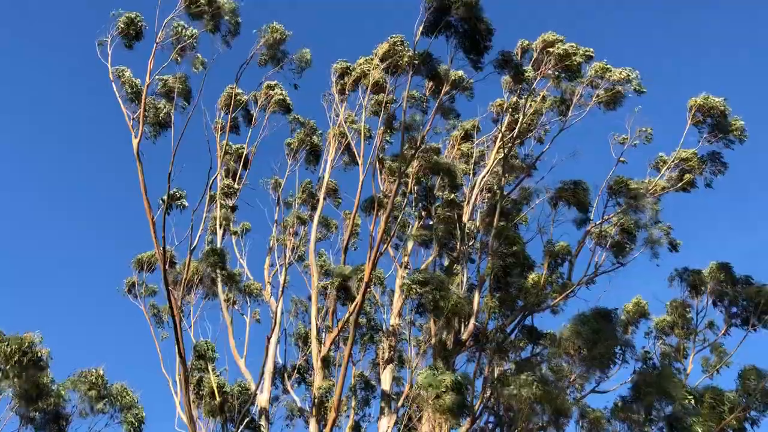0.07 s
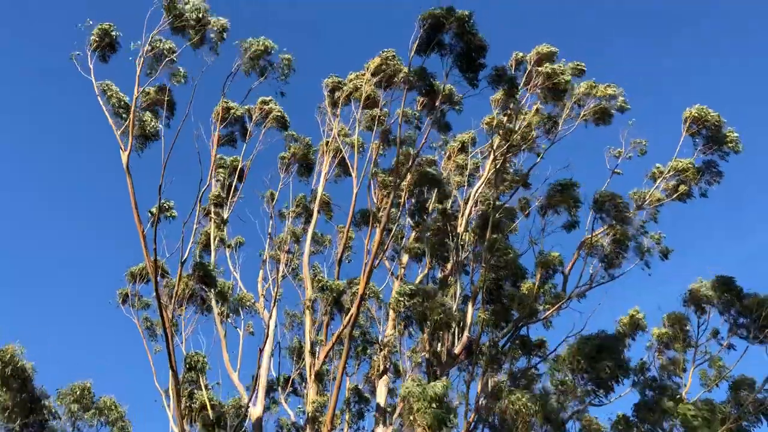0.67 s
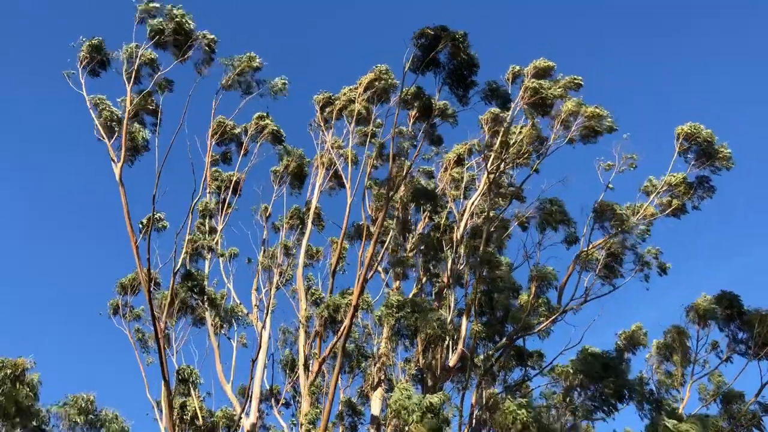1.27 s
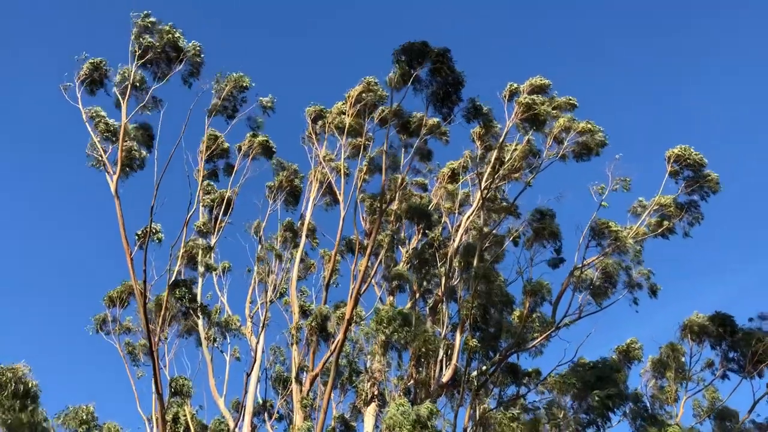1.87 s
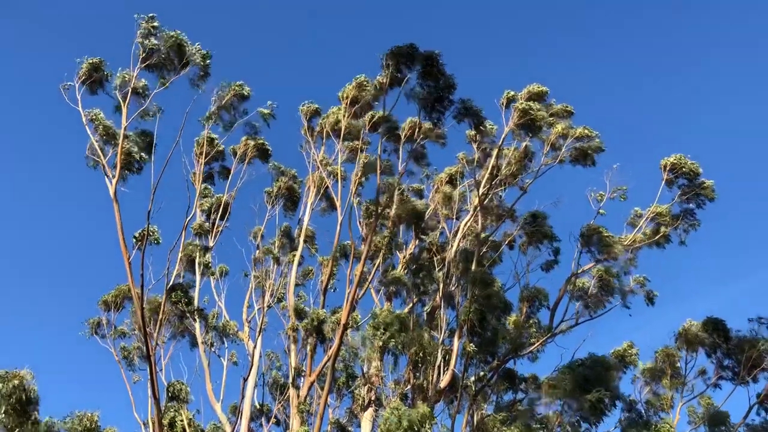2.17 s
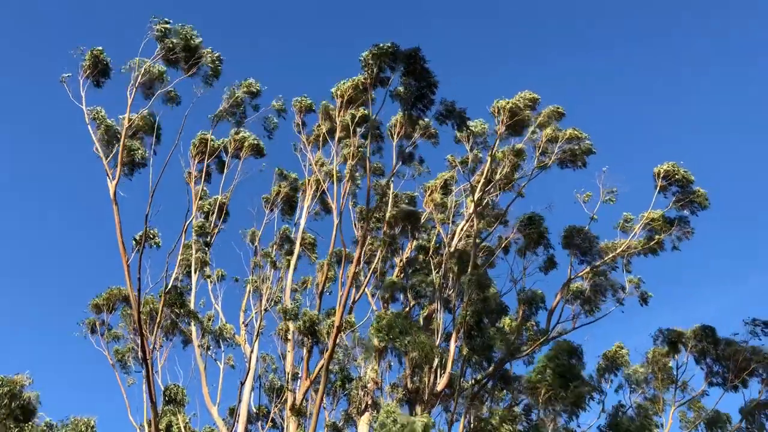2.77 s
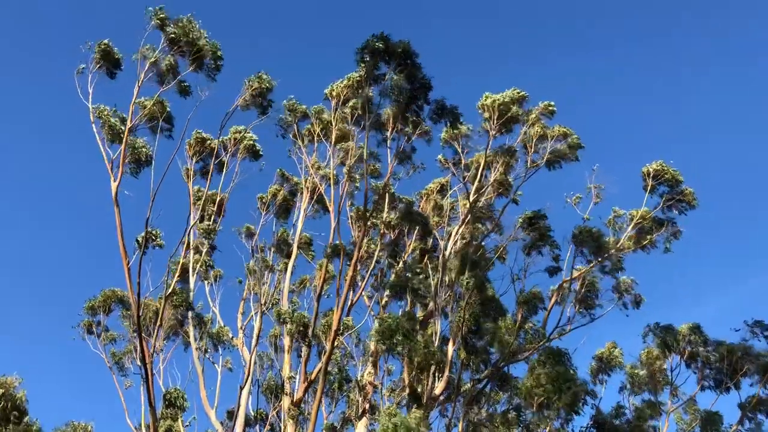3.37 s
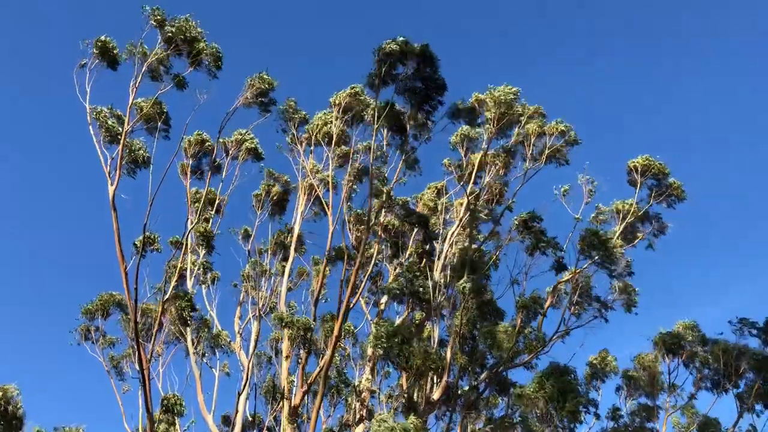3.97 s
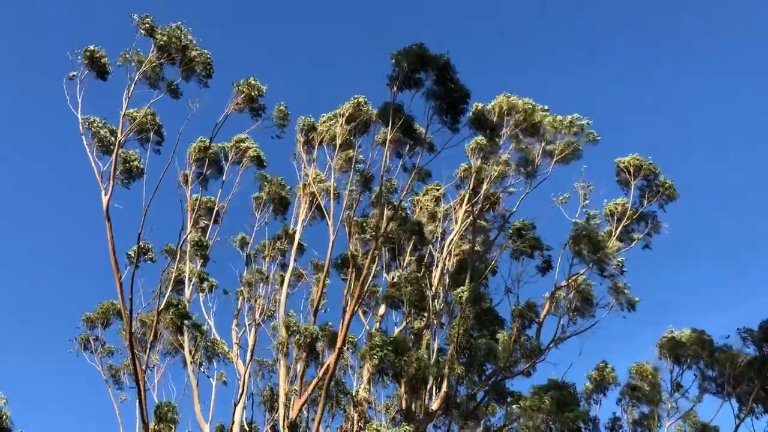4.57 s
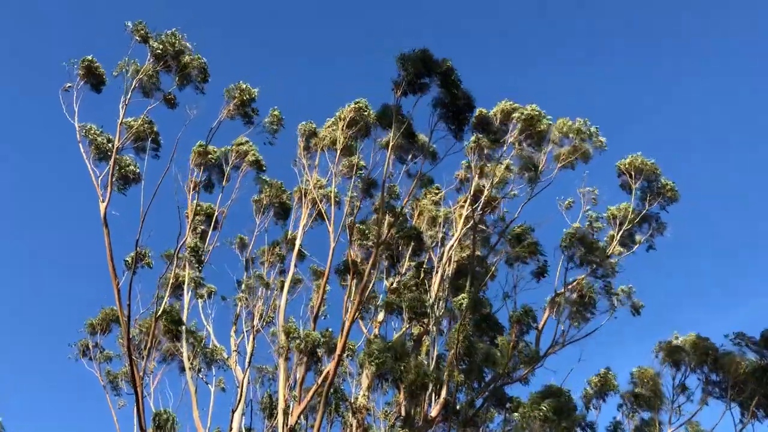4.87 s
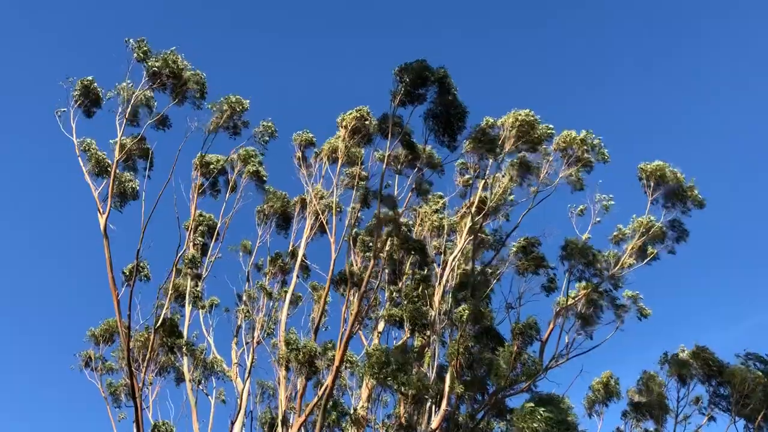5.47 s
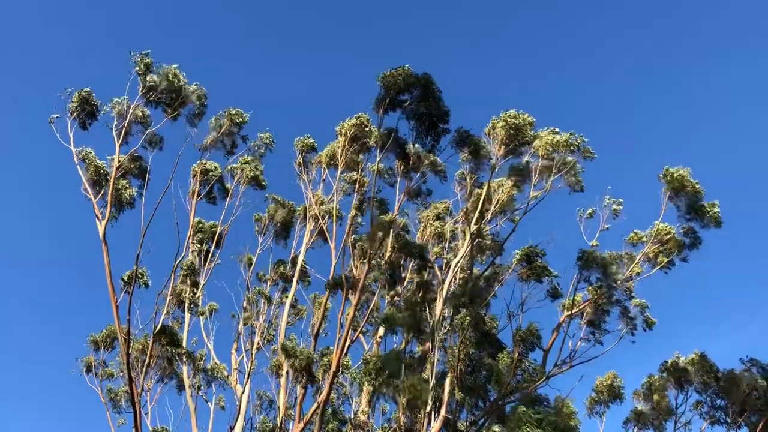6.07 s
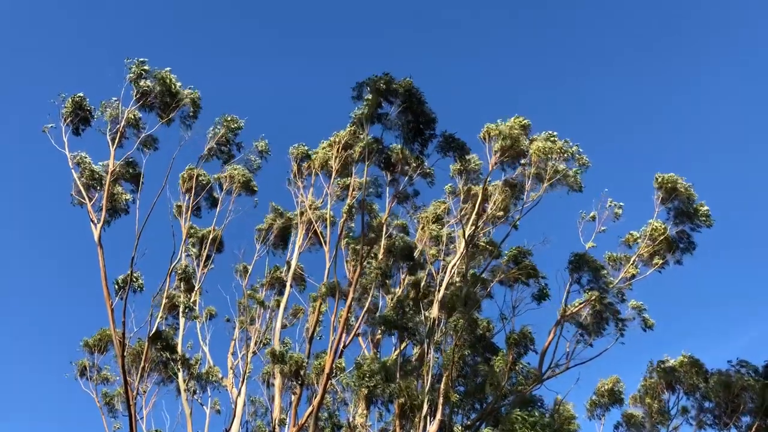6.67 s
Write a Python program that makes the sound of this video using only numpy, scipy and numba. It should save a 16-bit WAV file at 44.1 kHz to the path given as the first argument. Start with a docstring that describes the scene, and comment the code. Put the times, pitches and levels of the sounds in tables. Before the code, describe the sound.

Wind buffets the microphone in hard blasts, then eases, leaving treetops rustling steadily and a small bird chipping faintly.

```python
"""Wind buffeting a phone's microphone port, on the ground under tall trees. The buffets last three seconds:
the faster the eddies, the louder and brighter they blast, and a limiter holds the peaks.
A light breeze follows a lull. Behind it all the treetops roar and rustle steadily,
a few dry ticks sound, and a small bird gives short runs of tiny chips."""
import sys
import numpy as np
from scipy import signal
from scipy.fft import rfft, irfft
from scipy.io import wavfile
from scipy.ndimage import uniform_filter1d, minimum_filter1d
from numba import njit

SR = 44100
rng = np.random.default_rng(int(sys.argv[2]) if len(sys.argv) > 2 else 0)


def output_pcm(signal):
    """Save a mono or channel-first signal as 16-bit PCM at the path in sys.argv[1].

    Samples are clipped to [-1, 1] before scaling.
    """
    pcm = np.clip(np.atleast_2d(signal).T, -1, 1) * 32767
    wavfile.write(sys.argv[1], SR, np.round(pcm).astype(np.int16))


N = 295911
TIME_S = np.arange(N) / SR

# Wind round the phone, dying into a lull. Each row: time in seconds, strength in dB.
WIND = [(0.03, -26.5), (0.61, -22.5), (0.92, -24), (0.96, -22.5), (1.5, -24.5), (1.52, -26.5), (1.83, -28),
        (1.87, -28.5), (2.01, -28), (2.24, -36.5), (2.33, -30), (2.88, -34.5), (2.9, -32), (3.14, -36),
        (3.71, -44.5), (3.95, -57.5)]
# Buffets on the port. Each row: start in seconds, hold in seconds, level in dB,
# corner of the eddy spectrum in Hz, deep thump in dB.
BUFFETS = [(0.195, 0.15, -19.5, 716, -44), (0.217, .003, -7, 1110, -37), (0.238, 0.059, -7, 1134, -40),
           (0.311, 0.019, -10, 900, -35), (0.525, 0.11, -21, 352, -20), (0.561, 0.049, -5.5, 1450, -28),
           (0.615, 0.049, -11.5, 1290, -24), (0.638, 0.015, -6, 2200, -26), (0.674, .01, -15.5, 326, -13),
           (0.731, 0.017, -9.5, 1180, -31), (0.75, .004, -11.5, 563, -28), (1.0, .003, -25, 845, -28),
           (1.058, 0.032, -22, 620, -22), (1.117, 0.061, -9.5, 1250, -36), (1.197, 0.031, -13, 950, -26),
           (1.25, 0.0058, -15, 693, -26), (1.311, 0.0052, -22, 770, -28), (1.376, 0.021, -21, 725, -25),
           (1.409, 0.012, -23, 830, -38), (1.433, .025, -28, 500, -33), (1.47, 0.0055, -24, 710, -30),
           (1.704, 0.035, -24.5, 337, -23), (1.78, 0.039, -31, 230, -26.5), (1.968, 0.097, -31, 356, -27),
           (2.442, .04, -28, 375, -27), (3.007, 0.081, -29.5, 384, -25.5), (3.051, 0.0088, -17, 534, -32)]


def undb(db):
    """Decibels to gain."""
    return 10 ** (np.asarray(db) / 20)


def unit(x):
    """Scale to rms 1."""
    return x / np.sqrt(np.mean(x ** 2))


def curves(table):
    """Interpolate each column over the times in the first."""
    times_s, *columns = np.transpose(table)
    return [np.interp(TIME_S, times_s, column) for column in columns]


def colour(x, points):
    """Filter by (Hz, dB) points; nothing passes above the last."""
    hz, db = np.transpose(points)
    bins_hz = np.maximum(np.fft.rfftfreq(2 * N, 1 / SR), 1)
    gain = undb(np.interp(np.log(bins_hz), np.log(hz), db, right=-np.inf))
    return irfft(rfft(x, 2 * N) * gain)[:N]


def smooth(x, samples):
    """Moving average, applied twice."""
    return uniform_filter1d(uniform_filter1d(x, samples), samples)


def wander(rate_hz):
    """Smoothed random steps, rms 1."""
    step = max(int(SR / rate_hz), 2)
    held = np.repeat(rng.standard_normal(N // step + 1), step)
    return unit(smooth(held, step)[:N])


def steady(x, span_s):
    """Hold rms at 1 over span_s, keeping faster flutter."""
    span = max(int(span_s * SR), 2)
    return x / np.sqrt(smooth(x ** 2, span) + 1e-18)


def add(out, centre_s, sound):
    """Mix in a short sound, centred on centre_s."""
    start = max(int(centre_s * SR) - len(sound) // 2, 0)
    out[start:start + len(sound)] += sound[:N - start]


@njit
def lowpass(x, corner_hz, damping):
    """State-variable low-pass with a moving corner."""
    y = np.empty(len(x))
    band_state, low_state = 0., 0.
    for i in range(len(x)):
        g = np.tan(np.pi * corner_hz[i] / SR)
        band = (band_state + g * (x[i] - low_state)) / (1 + g * (g + damping))
        y[i] = low_state + g * band
        band_state, low_state = 2 * band - band_state, 2 * y[i] - low_state
    return y


@njit
def peak_hold(x, decay):
    """Peak follower: instant attack, exponential release."""
    y, peak = np.empty(len(x)), 0.
    for i in range(len(x)):
        peak = max(abs(x[i]), peak * decay)
        y[i] = peak
    return y


def treetops(sway_db=0.97, flicker_db=.5, grain_db=4.0, touches_per_s=9000, sizzle_db=-18.0):
    """Branches roar smoothly; thousands of uneven leaf touches merge into a hiss."""
    # Each row: time in seconds, branch roar in dB, leaf hiss in dB.
    crown_levels = [(0, -43.5, -51.5), (.55, -48, -51), (.59, -49.5, -53.5), (1.5, -48, -55),
                    (2, -45.5, -51.5), (2.6, -46, -52.5), (3.4, -46, -52), (4.2, -46.5, -52),
                    (5, -46.5, -53.5), (5.8, -47, -53.5), (6.7, -45.5, -54)]
    # Spectra. Each row: frequency in Hz, gain in dB.
    roar_spectrum = [(100, -11.5), (240, 1.5), (340, -1.5), (430, 0), (560, -2.5), (800, -4.5), (1200, -8),
                     (2000, -15), (3000, -21), (6000, -59.5)]
    leaf_spectrum = [(800, 0.5), (1600, 3.5), (2400, 1), (3500, -0.5), (5000, -4), (7000, -8.5),
                     (9000, -12), (11000, -18), (13000, -24), (16500, -29.5)]
    sizzle_spectrum = [(3000, -25.5), (6000, 3.5), (9000, 0), (12000, -7), (16500, -17)]
    roar_db, leaf_db = curves(crown_levels)
    roar = unit(colour(rng.standard_normal(N), roar_spectrum))
    touches = (rng.random(N) < touches_per_s / SR) * rng.standard_normal(N)
    touches *= undb(grain_db * np.minimum(rng.exponential(size=N), 4))
    leaves = unit(colour(unit(touches) + 1.47 * rng.standard_normal(N), leaf_spectrum))
    # the finest sizzle swings further than the rest of the hiss
    sizzle = unit(colour(rng.standard_normal(N), sizzle_spectrum))
    leaves += sizzle * undb(sizzle_db + 1.8 * (leaf_db - leaf_db.mean()))
    roar *= undb(roar_db + sway_db * wander(5.8))
    leaves *= undb(leaf_db + flicker_db * wander(21.82))
    return roar + leaves


def ticks(sigma_s=0.0015):
    """Thin, dry ticks: noise bursts high in the treble."""
    # Each row: time in seconds, level before filtering in dB.
    bursts = [(.63, -57), (.647, -59), (1.243, -54), (2.42, -55), (5.77, -60), (5.905, -58)]
    out, t = np.zeros(N), np.arange(-512, 512) / SR
    envelope = np.exp(-.5 * (t / sigma_s) ** 2)
    for time_s, db in bursts:
        add(out, time_s, undb(db) * envelope * rng.standard_normal(len(t)))
    return colour(out, [(3000, -26), (7000, -4), (10000, -1), (15000, 1)])


def chips(gap_s=.098, fade_db_per_chip=0.4, scatter_octaves=0.059, scatter_db=1.7):
    """The bird's runs as single chips: evenly spaced, fading, no two quite alike."""
    # Each row: first and last chip in seconds, pitch in Hz, base level in dB, relative overtones in dB.
    runs = [(0.151, 0.151, 2360, -41.5, -12), (0.373, 0.474, 2200, -39, -12),
            (0.434, 0.434, 2200, -41, -13), (0.865, 1.063, 2380, -46.5, -11), (1.366, 1.74, 2380, -46, -9),
            (1.945, 2.133, 2220, -43, -7), (2.957, 2.957, 2400, -45, -13), (3.143, 3.437, 2380, -40.5, -12),
            (3.505, 3.619, 2180, -43, -14), (3.554, 3.554, 2350, -43, -19), (3.833, 3.94, 2130, -44, -13),
            (3.883, 3.992, 2350, -45, -7), (4.087, 4.377, 2180, -41.5, -9),
            (4.471, 4.471, 2490, -47.5, -12)]
    for first_s, last_s, pitch_hz, run_db, bright_db in runs:
        count = 1 + round((last_s - first_s) / gap_s)
        for k, time_s in enumerate(np.linspace(first_s, last_s, count)):
            higher, louder = rng.standard_normal(2)
            db = run_db - fade_db_per_chip * k + scatter_db * louder
            yield time_s, pitch_hz * 2 ** (scatter_octaves * higher), db, db + bright_db


def bird(fall_octaves_per_s=55, sigma_s=0.0017, lead_s=0.00042, body_gain_db=3.0, edge_gain_db=2.0):
    """Each chip is a rough, falling squeak of a few ms; its overtones lead the fundamental."""
    out, t = np.zeros(N), np.arange(-256, 256) / SR
    roughness_rad = .7 * wander(2000)
    for time_s, pitch_hz, body_db, edge_db in chips():
        hz = pitch_hz * 2 ** (-fall_octaves_per_s * t)
        phase = 2 * np.pi * np.cumsum(hz) / SR
        jitter = roughness_rad[int(time_s * SR):][:len(t)]
        body = np.exp(-.5 * (t / sigma_s) ** 2) * np.sin(phase + jitter)
        overtones = np.sin(2 * phase + jitter) + 0.71 * np.sin(3 * phase + jitter)
        edge = np.exp(-.5 * ((t + lead_s) / sigma_s) ** 2) * overtones
        add(out, time_s, undb(body_db + body_gain_db) * body + undb(edge_db + edge_gain_db) * edge)
    return out


def slow_eddies(spectrum, span_s):
    """Large, slow eddies: a deep flutter, rms 1."""
    return steady(colour(rng.standard_normal(N), spectrum), span_s)


def breeze(start_s=3.68, rise_s=1.0, level_db=-46, wander_db=2):
    """A light breeze rises out of the lull as a low drone with soft puffs."""
    # Each row: centre in seconds, half length in seconds, level in dB.
    puffs = [(4.252, 0.013, -41), (4.36, 0.036, -40), (5.2, 0.32, -45.5), (5.798, .03, -38),
             (6.629, 0.01, -35.5)]
    # Each row: frequency in Hz, gain in dB.
    drone_spectrum = [(20, -30.5), (32, -26), (48, -6), (90, -2), (135, -1.5), (200, -6.5), (280, -21),
                      (600, -58), (1500, -64.5)]
    rise = np.clip((TIME_S - start_s) / rise_s, 0, 1)
    power = rise * undb(level_db + wander_db * wander(11)) ** 2
    for centre_s, half_s, db in puffs:
        power += undb(db) ** 2 * np.exp(-((TIME_S - centre_s) / half_s) ** 2)
    return np.sqrt(power) * slow_eddies(drone_spectrum, span_s=0.13)


def buffet_envelope(start_s, hold_s, attack_tau_s=0.0051, release_tau_s=0.008):
    """Quick rise, hold, slightly slower fall."""
    early_s = np.maximum(start_s - TIME_S, 0)
    late_s = np.maximum(TIME_S - start_s - hold_s, 0)
    return np.exp(-np.minimum(early_s / attack_tau_s + late_s / release_tau_s, 20))


def rumble(offset_db=-0.5, wander_db=2.5):
    """Slow eddies follow the wind's strength and thump with each buffet."""
    # Each row: frequency in Hz, gain in dB.
    rumble_spectrum = [(20, -54), (30, -28), (42, -9), (70, -1.5), (110, -5.5), (160, -7.5), (300, -21),
                       (600, -80), (1500, -82)]
    power = undb(curves(WIND)[0] + offset_db + wander_db * wander(14)) ** 2
    for start_s, hold_s, _, _, thump_db in BUFFETS:
        power += (undb(thump_db) * buffet_envelope(start_s, hold_s)) ** 2
    return np.sqrt(power) * slow_eddies(rumble_spectrum, span_s=0.061)


def airflow(brisk_db=-26, stir_db=-30, stir_hz=252, db_per_db=0.89, octaves_per_db=0.2064):
    """Eddy level in dB and corner in Hz: buffets ride on the wind; the strongest sets the brightness."""
    # small eddies between buffets: stir_db and stir_hz when the wind is at brisk_db
    excess_db = curves(WIND)[0] - brisk_db
    power = undb(stir_db + db_per_db * excess_db) ** 2
    weighted_hz = power * stir_hz * 2 ** (octaves_per_db * excess_db)
    for start_s, hold_s, db, corner_hz, _ in BUFFETS:
        envelope = buffet_envelope(start_s, hold_s)
        buffet_power = (undb(db) * envelope) ** 2
        power += buffet_power
        weighted_hz += buffet_power * corner_hz * envelope ** 0.2  # duller as it fades
    return 10 * np.log10(power), weighted_hz / power


def buffeting(damping=1.59, flutter_hz=150, flutter_db=1.8, flutter_octaves=.16, viscous_ratio=3.1):
    """Eddies shake the port; each surge of air speed makes them louder and brighter."""
    # Each row: frequency in Hz, gain in dB.
    port_response = [(60, -27), (130, -9.5), (250, -1.5), (450, 1), (700, 0), (1150, 2.5), (1700, 0),
                     (2600, 0.5), (4200, -2.5), (12000, 8)]
    level_db, corner_hz = airflow()
    surge = wander(flutter_hz)
    corner_hz = np.clip(corner_hz * 2 ** (flutter_octaves * surge), 50, SR / 4)
    # smaller eddies spread the same power over a wider band
    stirring = rng.standard_normal(N) / np.sqrt(corner_hz)
    eddies = lowpass(lowpass(stirring, corner_hz, damping), corner_hz, damping)
    # viscosity wipes out the smallest eddies
    eddies = lowpass(eddies, np.minimum(viscous_ratio * corner_hz, SR / 4), np.sqrt(2))
    pressure = steady(eddies, span_s=0.013) * undb(level_db + flutter_db * surge)
    return colour(pressure, port_response)


def scene():
    """Wind on the microphone in front of the trees and the bird; mono."""
    return (rumble() + breeze() + buffeting() + treetops() + bird() + ticks())[None]


def record(dry, ceiling=.68, release_s=0.01, cutoff_hz=15600):
    """A look-ahead limiter ducks everything under the hardest blasts; a steep low-pass follows."""
    peaks = peak_hold(dry[0], np.exp(-1 / (release_s * SR)))
    gain = np.minimum(1, ceiling / (peaks + 1e-9))
    gain = smooth(minimum_filter1d(gain, size=121), samples=61)
    treble_cut = signal.ellip(12, .1, 80, cutoff_hz, fs=SR, output="sos")
    return signal.sosfilt(treble_cut, dry * gain)


dry = scene()
out = record(dry)
output_pcm(out)
```